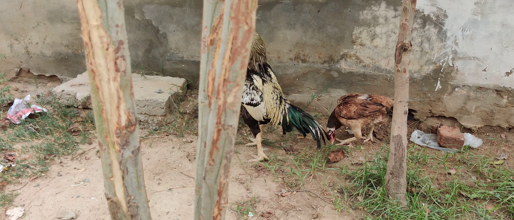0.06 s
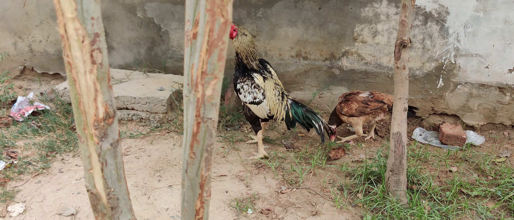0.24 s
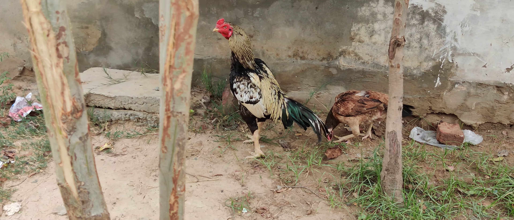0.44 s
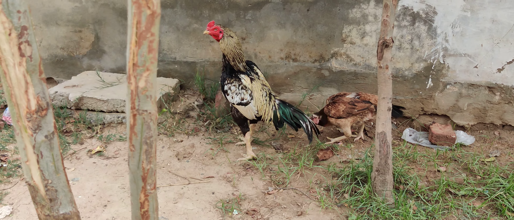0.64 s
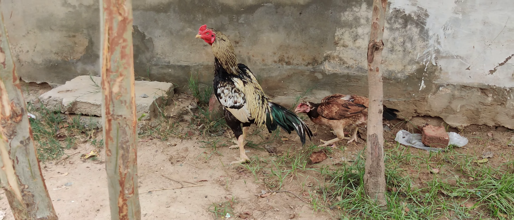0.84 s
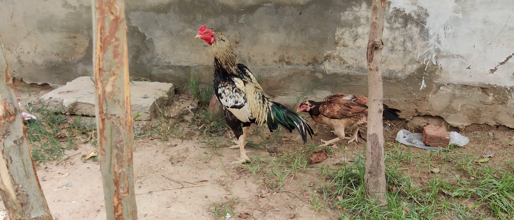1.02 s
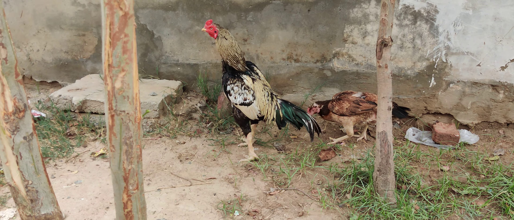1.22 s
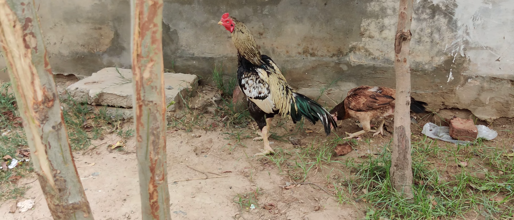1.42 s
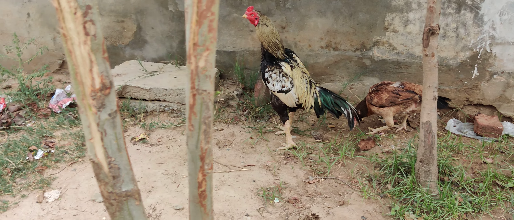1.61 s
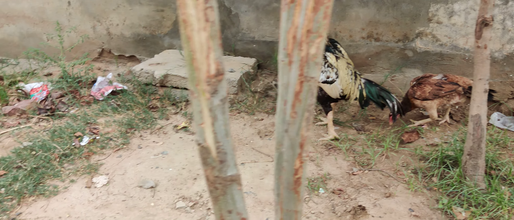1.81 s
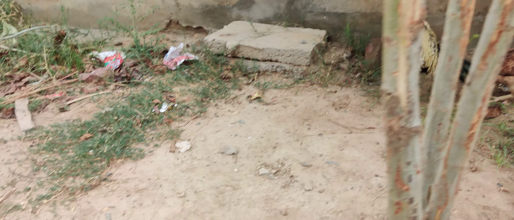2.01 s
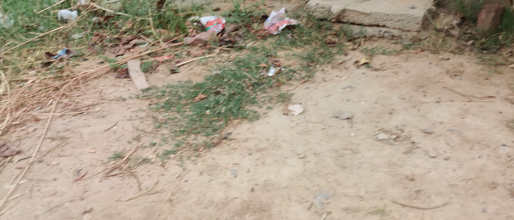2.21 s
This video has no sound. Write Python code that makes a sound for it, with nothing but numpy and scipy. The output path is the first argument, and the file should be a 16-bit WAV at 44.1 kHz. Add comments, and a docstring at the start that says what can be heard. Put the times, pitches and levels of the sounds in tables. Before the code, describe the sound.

One long, raspy rooster crow rings out on the right in a quiet yard.

```python
"""Faint outdoor air, a low hum and a light wind rumble fill a walled farmyard from the start.
A rooster crows once, almost wholly on the right. The two sides of its voice box (the syrinx)
start on one clear note, split into a hoarse two-pitched scream and join again for the falling end.
A small bird peeps twice during the crow. Afterwards the walls ring on and a foot scuffs the ground."""
import sys
import numpy as np
from scipy import signal
from scipy.fft import rfft, irfft, next_fast_len
from scipy.io import wavfile
from scipy.ndimage import uniform_filter1d

SR = 44100
rng = np.random.default_rng(int(sys.argv[2]) if len(sys.argv) > 2 else 0)


def bounce(signal):
    """Save signal as a 16-bit WAV file at the path given by the first command-line argument."""
    frames = np.transpose(np.atleast_2d(signal))
    limited = np.clip(frames, -1, 1)
    pcm = np.round(limited * 32767).astype(np.int16)
    wavfile.write(sys.argv[1], SR, pcm)


N = 103635
T = np.arange(N) / SR   # the time of each sample [s]
SIZE = next_fast_len(N + SR, True)   # a spare second gives echoes room to fade
HZ = np.maximum(np.arange(SIZE // 2 + 1) * SR / SIZE, 1)   # the frequencies that filters work on


# The voice's five bands, low to high: (lower edge [Hz], upper edge [Hz], boost [dB])
VOICE_BANDS = [(496, 845, 2.5), (963, 1590, 2.5), (1636, 2780, 2.5), (2240, 4190, 2.5), (3240, 15000, 2.5)]
# How loud each band is before its boost: (time [s], level of band 1 [dB], ..., level of band 5 [dB])
BAND_LEVELS = [(0.19, -63.5, -62, -61, -62, -75), (0.216, -39.5, -52, -49, -55, -49),
               (0.248, -38, -29, -37.5, -40.5, -47), (0.326, -56, -24.5, -34, -47, -44.5),
               (0.332, -37, -30.5, -30, -38, -44), (0.468, -51.5, -38.5, -51, -44.5, -56),
               (0.5, -49, -69, -41, -76, -59), (0.526, -46, -39.5, -59.5, -47, -57),
               (0.584, -41, -30.5, -34.5, -40.5, -51), (0.844, -33.5, -26.5, -26.5, -36, -43),
               (0.902, -36, -29.5, -26.5, -34, -40), (1.022, -39, -28, -37.5, -37, -50),
               (1.07, -42, -39, -37.5, -46, -50.5), (1.26, -40, -33, -33, -35.5, -46),
               (1.376, -43.5, -32, -37.5, -43.5, -47.5), (1.428, -35, -37, -33.5, -38.5, -46.5),
               (1.502, -44, -38, -34.5, -44.5, -49), (1.718, -38.5, -29, -34.5, -59, -47),
               (1.734, -38.5, -33, -26.5, -53, -47.5), (1.778, -28, -24, -33.5, -54, -47.5),
               (1.804, -30, -39.5, -28, -50, -50), (1.82, -27.5, -28.5, -23.5, -54, -43.5),
               (1.836, -34, -49, -32, -48, -48.5), (1.872, -34, -35, -39.5, -54, -49),
               (1.966, -44.5, -53, -41, -60.5, -57.5), (1.988, -43.5, -39, -54, -62, -60),
               (2.062, -42, -51.5, -50, -62, -59.5), (2.085, -56, -44, -30, -57, -65)]
def rooster(smoothing_s=0.037, fade_in_s=0.0082, fade_out_s=0.031):
    """The voice box sounds through the throat; each band of the voice swells and fades on its own."""
    spectrum = rfft(throat(voice_box()), SIZE)
    crow = 0
    for (low_hz, high_hz, boost_db), level_db in zip(VOICE_BANDS, over_time(BAND_LEVELS)):
        part = irfft(spectrum / (1 + (low_hz / HZ) ** 30) / (1 + (HZ / high_hz) ** 30), SIZE)[:N]
        power = np.abs(uniform_filter1d(part ** 2, int(smoothing_s * SR)))
        steady = part / np.sqrt(power + 1e-12)   # evened out, so the table sets the loudness
        crow = crow + steady * from_db(level_db + boost_db)
    start_s, end_s = BAND_LEVELS[0][0], BAND_LEVELS[-1][0]
    return crow * np.clip((T - start_s) / fade_in_s, 0, 1) * np.clip((end_s - T) / fade_out_s, 0, 1)


# The note of the voice box's main side: (time [s], pitch [Hz])
MAIN_SIDE = [(.2, 657), (.235, 684), (.28, 700.6), (.35, 697.4), (.54, 692), (.585, 759.2), (.76, 778.4),
             (.9, 769.2), (1.03, 751.5), (1.14, 718.2), (1.22, 681.8), (1.31, 674), (1.36, 737.5),
             (1.54, 750), (1.62, 684.8), (1.7, 662), (1.8, 649.4), (1.9, 631.7), (2.08, 627.7)]
# The other side, heard when the bird strains: (time [s], pitch [Hz], level against the main side [dB])
OTHER_SIDE = [(.2, 560, 9), (.27, 630, -18.5), (.34, 660, -10.5), (.53, 634.8, 0.5), (.62, 655.2, -4.5),
              (.85, 642.3, 1), (1.05, 656.6, 1), (1.22, 615, -5), (1.3, 568.8, -4.5), (1.44, 560, -9),
              (1.56, 570, -22.5), (1.68, 628.4, -32), (1.82, 618, -28), (1.9, 602.2, -3.5),
              (2.1, 630.6, -29.5)]
# How rough the voice is: (time [s], pitch shake [share of pitch], rasp [dB], undertones [dB])
HOARSENESS = [(.2, 0.015, -17, -34), (.27, 0.016, -21, -36), (.34, .014, -13.5, -26),
              (.52, 0.011, -9, -27.5), (.62, .012, -5.5, -24.5), (.88, 0.016, -1, -15),
              (1.1, 0.0224, 2.5, 1), (1.27, 0.015, -6.5, -3.5), (1.4, 0.0093, -10.5, -7.5),
              (1.55, .012, -16, -5.5), (1.7, 0.014, -16.5, -36.5), (1.8, 0.013, -32.5, -50),
              (2.1, 0.015, -9.5, -24)]
def voice_box(flutter_db=1.5, rasp_flutter_db=1.54, flutters_per_s=110):
    """Two thin skins vibrate in the bird's breath, and air rasps through on each swing."""
    main_hz, = over_time(MAIN_SIDE)
    other_hz, other_db = over_time(OTHER_SIDE)
    shake, rasp_db, undertone_db = over_time(HOARSENESS)
    main, phase = vibrating_skin(main_hz, shake)
    other, _ = vibrating_skin(other_hz, shake)
    # Pulses that repeat only every second and fourth swing add lower tones.
    undertones = 1.57 * from_db(undertone_db) * (np.cos(phase / 2) + np.cos(phase / 4))
    tone = main * (1 + undertones) + from_db(other_db) * other
    breath = from_db(rasp_db) * rasp(phase, rasp_flutter_db * wander(flutters_per_s))
    flutter = from_db(flutter_db * shake / shake.max() * wander(flutters_per_s))
    return (tone + breath) * flutter


def vibrating_skin(hz, shake, shakes_per_s=262, wobble=0.00603, wobbles_per_s=32.6):
    """One skin makes slightly uneven pulses; its phase says how far it is through its swings."""
    pitch = hz * (1 + shake * wander(shakes_per_s) + wobble * wander(wobbles_per_s))
    phase = 2 * np.pi * np.cumsum(pitch) / SR
    wave = np.cos(phase)
    fade = 0.862   # each overtone's strength against the one below
    pulses = (wave - fade) / (1 - 2 * fade * wave + fade ** 2)
    return unit_level(pulses), phase


# The tone of the rasp: (frequency [Hz], boost [dB])
RASP_TONE = [(600, 3.5), (850, 12.5), (1300, 7.5), (2500, 6), (6000, 2.5), (12000, -2.5)]
def rasp(phase, flutter_db):
    """Air hisses through the voice box, one puff for each swing."""
    puffs = noise() * (1 + np.cos(phase)) * from_db(flutter_db)
    return 3 * filtered(unit_level(puffs), from_db(over_frequency(RASP_TONE)))


# How far the beak is open: (time [s], opening [0 narrow to 1 wide])
BEAK_OPENING = [(.2, 0.67), (.53, 0.2), (.59, 0.88), (1.02, 1), (1.19, 0), (1.6, 0.18), (1.75, 0.03)]
# Where throat and beak ring: (frequency [Hz], width [Hz], narrow-beak level [dB], wide-beak level [dB])
THROAT_RINGS = [(602.2, 100, 2.5, -0.5), (784, 170, -6, -9), (1017, 460, -10.5, -7), (1372, 300, 6, -16.5),
                (1547.3, 250, -7, 11.5), (1934, 140, 16.5, 4.5), (2043, 326, 3.5, 6), (2726, 135, 3, -10),
                (2883, 250, -20.5, 0), (4280, 2700, -32.5, -31.5), (4784, 596, -7.5, -17.5),
                (5603, 570, -9, -9), (6420, 270, -28, -21), (6960, 94, -25.5, -23), (7670, 89, -35, -29),
                (9400, 1400, -34, -32.5), (12130, 5000, -28.5, -37)]
def throat(sound):
    """The throat strengthens some frequencies; opening the beak changes which ones stand out."""
    opening, = over_time(BEAK_OPENING)
    power = 0
    for hz, width_hz, narrow_db, wide_db in THROAT_RINGS:
        distance = abs(HZ - hz) / width_hz
        peak = np.exp(-distance / 2) / (1 + (2 * distance) ** 2) ** 2
        power = power + from_db([[narrow_db], [wide_db]]) ** 2 * peak
    narrow, wide = filtered(sound, np.sqrt(power))
    return (1 - opening) * narrow + opening * wide


# Sound bouncing back from the walls: (delay [s], level [dB])
WALL_BOUNCES = [(.0065, -12.5), (.021, -11.5), (.047, -23.5)]
def yard(sound, ring_s=0.91, ring_db=0.5, treble_ring_s=0.25, treble_db=5.5, treble_hz=2400):
    """The sound arrives directly, bounces off the walls and rings on; the treble dies first."""
    bounces = sum(from_db(db) * np.exp(-2j * np.pi * HZ * delay_s) for delay_s, db in WALL_BOUNCES)
    lows = 1 / (1 + (HZ / treble_hz) ** 8)
    hiss = rng.standard_normal((2, SR))
    slow_fade = from_db(-60 * T[:SR] / ring_s)
    fast_fade = from_db(treble_db - 60 * T[:SR] / treble_ring_s)
    ring = lows * rfft(hiss * slow_fade, SIZE) + (1 - lows) * rfft(hiss * fast_fade, SIZE)
    ring /= np.sqrt(np.sum(slow_fade ** 2))
    return filtered(sound, 1 + bounces + from_db(ring_db) * ring)


# Each peep: (time [s], length [s], start pitch [Hz], end pitch [Hz], level [dB])
BIRD_PEEPS = [(1.015, .04, 4204, 4085, -36), (1.812, 0.022, 5440, 4290, -36.5)]
def small_bird():
    """A small bird gives short whistles that slide down."""
    peeps = 0
    for start_s, length_s, start_hz, end_hz, db in BIRD_PEEPS:
        progress = np.clip((T - start_s) / length_s, 0, 1)
        pitch = start_hz + (end_hz - start_hz) * progress
        whistle = np.sin(2 * np.pi * np.cumsum(pitch) / SR)
        peeps = peeps + from_db(db) * np.sin(np.pi * progress) * whistle
    return peeps


def foot_scuff(time_s=2.26, swell_s=0.038, level_db=-46.5):
    """A foot brushes the dry ground: a hiss that quickly comes and goes."""
    swell = np.exp(-((T - time_s) / swell_s) ** 2)
    return from_db(level_db) * noise_band(hz=2130, width_hz=1160) * swell


# The tone of the outdoor air: (frequency [Hz], relative level [dB])
AIR_TONE = [(20, -1), (55, -4.5), (120, -13), (280, -15), (450, -16.5), (1000, -25), (2400, -20),
            (4000, -29), (6200, -28), (7000, -45), (9500, -43), (15000, -43)]
# Which ear hears more of the air: (frequency [Hz], left minus right [dB])
AIR_SIDES = [(60, -1), (200, -7), (700, -9), (1290, -19), (2380, -19), (6000, -21), (7500, -9),
             (15000, 0.5)]
# How alike the air is in both ears: (frequency [Hz], likeness [-1 opposite to 1 same])
EAR_LIKENESS = [(60, 0.53), (130, 0.85), (290, 0.5), (640, 0.42), (1410, 0.99), (3100, 0.9), (6820, -0.91),
                (15000, 0.3)]
def outdoor_air(level_db=-45.5):
    """A soft, deep rush of air, partly shared by both ears and stronger on the right."""
    alike = over_frequency(EAR_LIKENESS)
    tone = from_db(over_frequency(AIR_TONE)) / (1 + from_db(over_frequency(AIR_SIDES)))
    shared = filtered(noise(), tone * np.sqrt(1 + alike))
    opposite = filtered(noise(), tone * np.sqrt(1 - alike))
    ears = unit_level(np.array([shared + opposite, shared - opposite]))
    return from_db(level_db) * lean_right(ears, AIR_SIDES)


def low_hum(level_db=-56.5):
    """A distant hum, made from a narrow band of deep noise."""
    return from_db(level_db) * noise_band(hz=87.7, width_hz=19)


# How strong the wind's rumble is: (time [s], level [dB])
WIND_LEVELS = [(0, -55), (1.6, -63), (1.95, -53.5), (2.35, -51)]
def wind():
    """Light wind rumbles, sinking away and then rising near the end."""
    level_db, = over_time(WIND_LEVELS)
    return from_db(level_db) * noise_band(hz=33.3, width_hz=13)


def from_db(db):
    """Turn decibels into a number to multiply by."""
    return 10 ** (np.asarray(db) / 20)


def unit_level(sound):
    """Scale a sound so that its average power is 1."""
    return sound / np.sqrt(np.mean(sound ** 2) + 1e-20)


def over_time(table):
    """Join a table's points with straight lines in time, one curve for each value column."""
    times, *columns = np.transpose(table)
    return [np.interp(T, times, column) for column in columns]


def over_frequency(table):
    """Join a table's points across frequency, giving each octave equal room."""
    hz, values = np.transpose(table)
    return np.interp(np.log(HZ), np.log(hz), values)


def filtered(sound, gain):
    """Turn each frequency up or down by its gain."""
    return irfft(rfft(sound, SIZE) * gain, SIZE)[..., :N]


def lean_right(ears, sides):
    """Make the sound weaker and duller in the left ear."""
    left, right = ears
    return np.array([filtered(left, from_db(over_frequency(sides))), right])


def noise():
    """An even hiss (white noise)."""
    return rng.standard_normal(N)


def noise_band(hz, width_hz):
    """Noise kept to a band around one frequency."""
    low_hz = np.sqrt(hz ** 2 + width_hz ** 2 / 4) - width_hz / 2
    band = signal.butter(2, [low_hz, low_hz + width_hz], "band", fs=SR, output="sos")
    return unit_level(signal.sosfilt(band, noise()))


def wander(per_s):
    """A smooth random curve that changes about per_s times a second."""
    memory = np.exp(-2 * np.pi * per_s / SR)
    return unit_level(signal.lfilter([1], [1, -2 * memory, memory * memory], noise()))


# How far to the right the yard's sounds are heard: (frequency [Hz], left minus right [dB])
YARD_SIDES = [(300, -6.5), (700, -13), (1290, -26), (2380, -37), (5500, -49), (9000, -38), (15000, -9)]
def scene():
    """Crow, peeps and scuff echo in the yard, over air, hum and wind."""
    echoing = yard(rooster() + small_bird() + foot_scuff())
    return lean_right(echoing, YARD_SIDES) + outdoor_air() + low_hum() + wind()


def record(dry, cutoff_hz=15500):
    """The very highest treble is cut off steeply."""
    return filtered(dry, 1 / (1 + (HZ / cutoff_hz) ** 160))


dry = scene()
out = record(dry)
bounce(out)
```